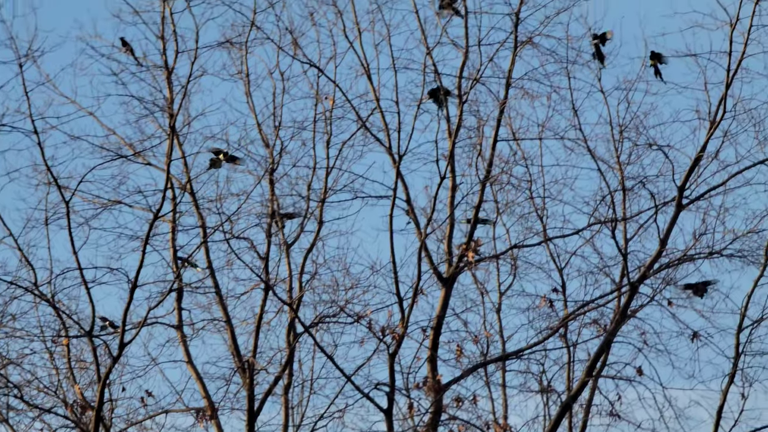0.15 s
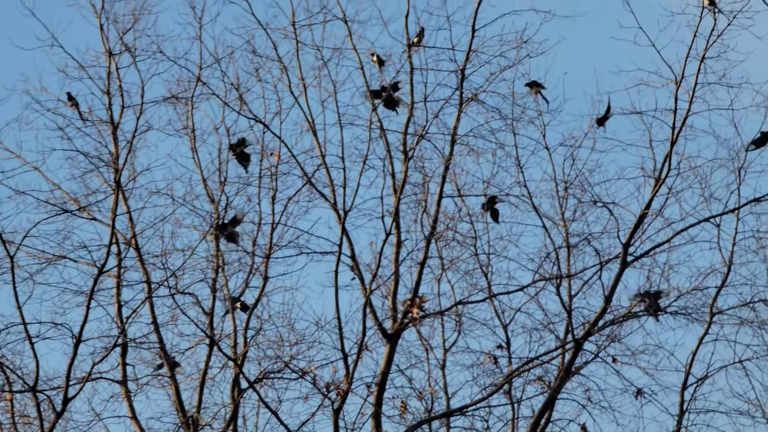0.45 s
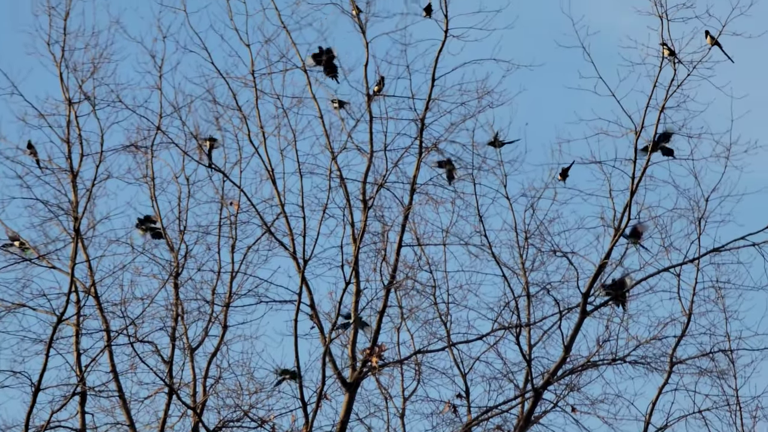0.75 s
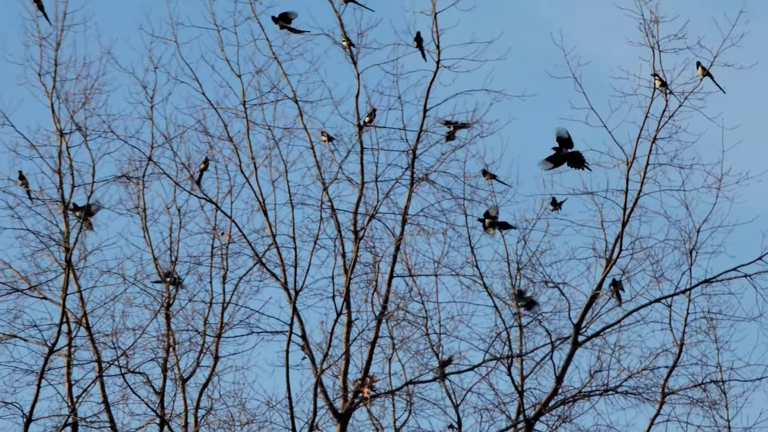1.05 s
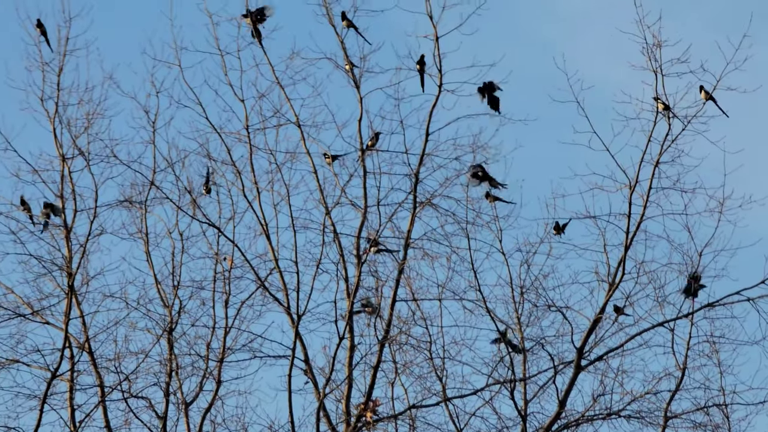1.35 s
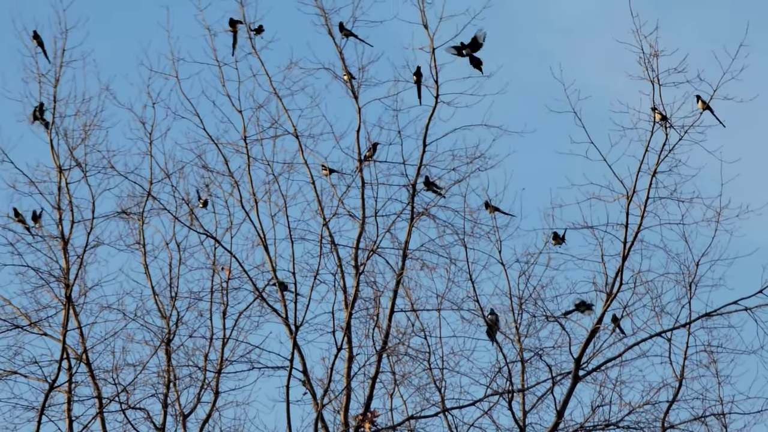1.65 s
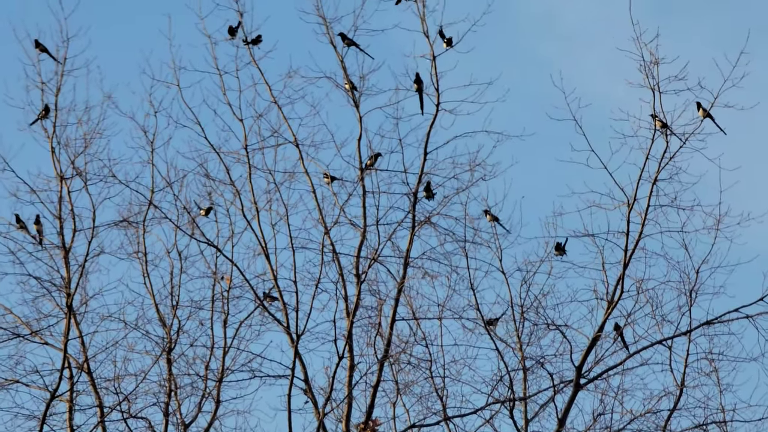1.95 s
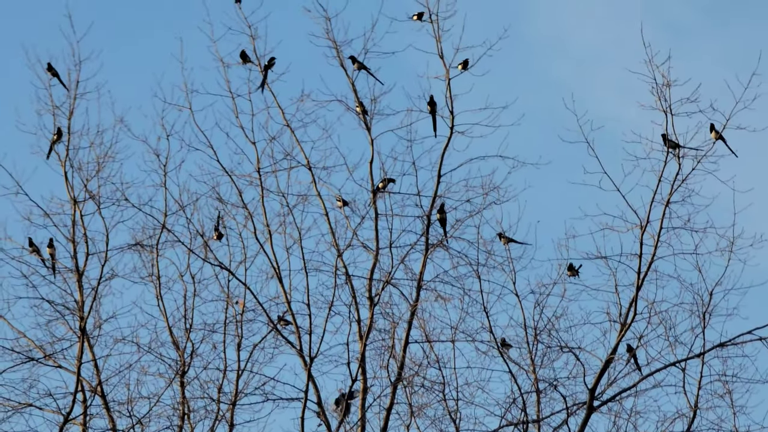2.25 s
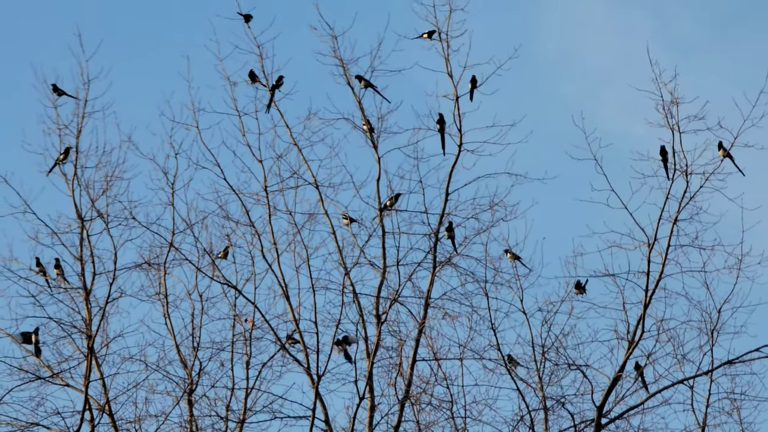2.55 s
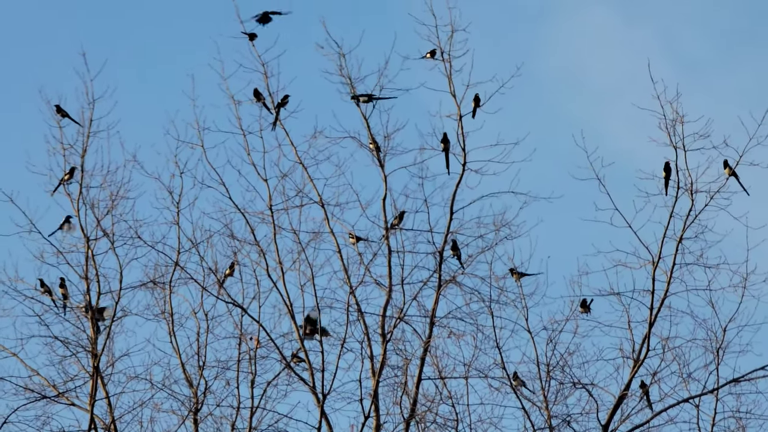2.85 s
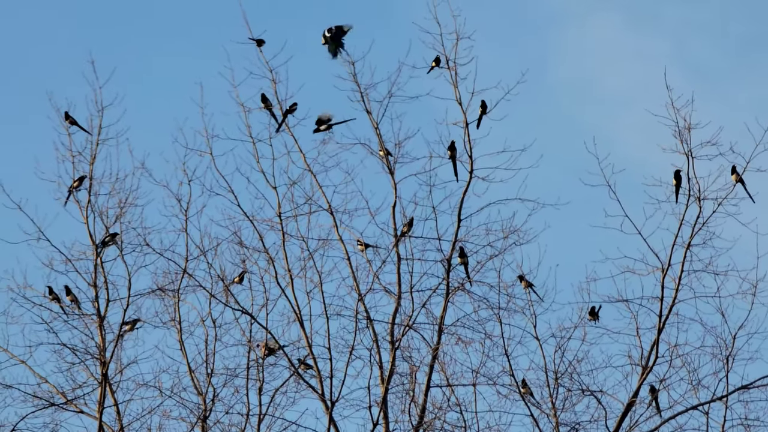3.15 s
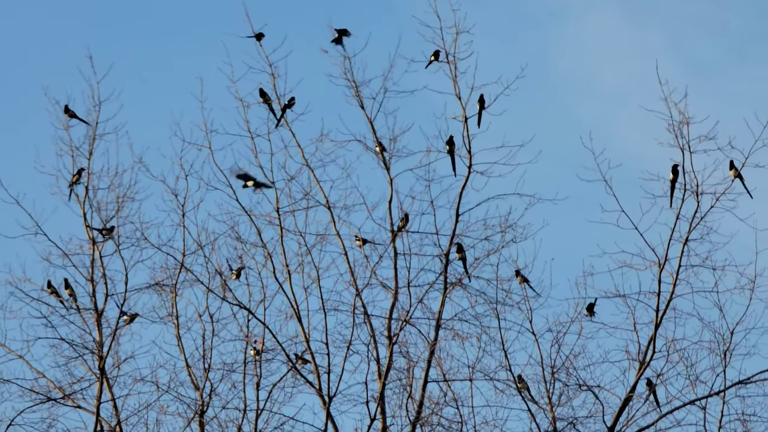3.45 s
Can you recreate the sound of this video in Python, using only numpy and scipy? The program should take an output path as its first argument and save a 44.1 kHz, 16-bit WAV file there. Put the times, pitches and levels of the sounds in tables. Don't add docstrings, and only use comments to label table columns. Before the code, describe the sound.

Magpies chatter harshly in bare treetops, hoarse rasps and quick rising chaks over low traffic rumble.

```python
import sys
import numpy as np
from scipy import signal
from scipy.io import wavfile

SR = 44100
rng = np.random.default_rng(int(sys.argv[2]) if len(sys.argv) > 2 else 0)


def transcribe(signal):
    frames = np.atleast_2d(signal).T
    limited = np.clip(frames, -1, 1)
    pcm = np.round(limited * 32767).astype(np.int16)
    wavfile.write(sys.argv[1], SR, pcm)


def volts(x):
    e = np.asarray(x, float) / 20
    return 10 ** e


N = 158760
FAR_LAG_S = 0.00028

# pitch_hz, width_hz, level_db
LOWER_THROAT = [(1723, 210, -11), (2150, 314, -13.5), (2942, 564, -1), (3964, 1000, -10.5)]
# pitch_hz, width_hz, level_db
UPPER_THROAT = [(4834, 790, 3), (5273, 730, -0.5), (6586, 880, -9)]


def rms_one(x):
    return x / np.sqrt(np.mean(x ** 2) + 1e-20)


def at_hz(points, hz):
    points = np.array(points)
    return np.interp(np.log(hz), np.log(points[:, 0]), points[:, 1])


def wobble(white, rate_hz):
    r = np.exp(-2 * np.pi * rate_hz / SR)
    return rms_one(signal.lfilter([1], [1, -2 * r, r * r], white))


def resonances(x, table):
    out = 0
    for k, (hz, width_hz, db) in enumerate(table):
        r = np.exp(-np.pi * width_hz * 1.5 / SR)
        b = (1 - r * r) / 2 * np.array([1, 0, -1])
        a = [1, -2 * r * np.cos(2 * np.pi * hz / SR), r * r]
        ringing = signal.lfilter(b, a, signal.lfilter(b, a, x))
        out = out + (-1) ** k * volts(db) * ringing
    return out


def banded_noise(spectrum, low_hz, count, patchy_db):
    # pitch_hz, likeness (0 to 1)
    likeness = [(30, 1), (200, 0.9), (500, 0.84), (1200, 0.21), (5000, 0.28), (12000, 0.045)]
    out = 0
    edges = np.minimum(low_hz * 2 ** (np.arange(count + 1) / 2), .45 * SR)
    white = rng.standard_normal((2, 2, N + 8000))
    for k, (low, high) in enumerate(zip(edges, edges[1:])):
        band = signal.butter(2, [low, high], "band", fs=SR, output="sos")
        mid, side = signal.sosfilt(band, white[k % 2])[:, 8000:]
        hz = np.sqrt(low * high)
        alike = np.clip(at_hz(likeness, hz), 0, 1)
        shared, apart = np.sqrt(1 + alike) * mid, np.sqrt(1 - alike) * side
        gain = volts(at_hz(spectrum, hz) + patchy_db * wobble(rng.standard_normal(N), 7.4))
        out = out + gain * np.array([shared + apart, np.roll(shared - apart, int(FAR_LAG_S * SR))])
    return rms_one(out)


def traffic():
    # pitch_hz, level_db (per Hz)
    rumble_colour = [(30, -19.5), (50, -11.5), (65, 4), (105, -7), (170, -12.5), (300, -17.5), (420, -18),
                     (1150, -22), (2500, -26)]
    rumble = banded_noise(rumble_colour, 24.82, count=15, patchy_db=1.7) * volts([[-.4], [.4]])
    drone = rms_one(resonances(rng.standard_normal(N), [(175.7, 8, 0)]))
    return volts(-44.5) * rumble + volts(-62.5) * drone


def hiss():
    bands = []
    for range_hz in [(12300, 15300), (7500, 11500)]:
        band = signal.butter(5, range_hz, "band", fs=SR, output="sos")
        bands.append(rms_one(signal.sosfilt(band, rng.standard_normal((2, N)))))
    high, air = bands
    high_level = volts(-77.5 + 1.6 * wobble(rng.standard_normal(N), 4.6))
    return high_level * volts([[-3.5], [3.5]]) * high + volts(-88) * air


def far_flock():
    # time_s, level_db
    swell = [(0, -47), (.6, -47), (1.15, -49), (1.2, -56.5), (1.3, -58.5), (1.9, -47.5), (2.3, -45.5),
             (3.1, -47.5), (3.6, -47.5)]
    white = rng.standard_normal((5, N))
    s, db = np.transpose(swell)
    murmur = resonances(white[:2], LOWER_THROAT) + volts(-11.0) * resonances(white[2:4], UPPER_THROAT)
    level_db = np.interp(np.arange(N) / SR, s, db) + 5.2 * wobble(white[4], 2.3)
    return volts(level_db) * volts([[-3.5], [3.5]]) * rms_one(murmur)


def hoots():
    # time_s, pitch_hz, level_db
    paths = [
        [(.005, 593, -53.5), (.042, 715, -37), (.082, 844, -53), (.13, 792, -48), (.15, 747, -52),
         (.2, 718, -57)],
        [(1.222, 650, -70), (1.238, 667, -43.5), (1.318, 746, -37.5), (1.35, 723, -45.5), (1.39, 715, -65),
         (1.46, 726, -54)],
        [(.02, 511, -63), (.1, 570, -52.5), (.2, 575, -66)],
    ]
    t, out = np.arange(N) / SR, 0
    for rows in paths:
        s, hz, db = np.transpose(rows)
        level = volts(np.interp(t, s, db, -150, -150) + wobble(rng.standard_normal(N), 28))
        phase = 2 * np.pi * np.cumsum(np.interp(t, s, hz)) / SR
        out = out + np.sqrt(2) * level * np.sin(phase)
    return np.array([out, np.interp(t - FAR_LAG_S, t, out)])


def voice(pitch_hz, upper_db, partials_db, jitter, rough, white):
    # pitch_hz, width_hz, level_db
    call_top = [(7440, 1100, -17.5), (12700, 6900, -43.5)]
    phase = 2 * np.pi * np.cumsum(pitch_hz * (1 + jitter * wobble(white[0], 127))) / SR
    flutter = volts(3.5 * wobble(white[1], 70))
    tones = 0
    for k, db in enumerate(partials_db, 2):
        own_flutter = np.roll(flutter, 900 * k)
        tones = tones + volts(db) * own_flutter * np.cos(k * phase + k * k)
    tones = rms_one(tones)
    breath = white[2] * (1 + np.cos(phase)) * flutter / 1.4
    low = (1 - rough) * tones + rough * breath
    upper_rough = rough + .25
    high = (1 - upper_rough) * tones + upper_rough * breath
    return (resonances(low, LOWER_THROAT) + volts(upper_db) * resonances(high, UPPER_THROAT)
            + volts(1.38 * upper_db) * resonances(high, call_top))


def place(out, x, start_s, pan_db, lag_s):
    t = np.arange(len(x)) / SR
    right = np.interp(t - lag_s, t, x)
    pair = np.array([x * volts(pan_db / 2), right * volts(-pan_db / 2)]) / np.cosh(pan_db * np.log(10) / 40)
    i = max(int(start_s * SR), 0)
    pair = pair[:, :out.shape[1] - i]
    out[:, i:i + pair.shape[1]] += pair


def calls(rows, octaves, swell_db, fall_s, partials_db, jitter, rough):
    out = np.zeros((2, N))
    for top_s, rise_s, db, top_hz, upper_db in rows:
        white, seat = rng.standard_normal((3, 12000)), rng.standard_normal(2)
        t = np.arange(12000) / SR - rise_s
        left = np.clip(-t / rise_s, 0, 1)
        pitch_hz = top_hz * 2 ** (-octaves * (np.hypot(left, .06) - .06))
        beak_db = upper_db - 4 * left
        call = voice(pitch_hz, beak_db, partials_db, jitter, rough, white)
        attack = np.clip((t + rise_s) / 0.019, 0, 1)
        shape = volts(-swell_db * left) * attack * np.exp(-np.maximum(t / fall_s, 0) ** 2)
        call = call / np.sqrt(np.mean(call[abs(t) < .02] ** 2)) * shape * volts(db)
        place(out, call, top_s - rise_s, -8.5 + 1.5 * seat[0], -0.000019 + .00005 * seat[1])
    return out


def magpies():
    # end_s, length_s, level_db, top_pitch_hz, upper_resonance_db
    glides = [(.16, 0.14, -48, 500, 5), (.785, 0.052, -42.5, 527.5, -3), (1.13, 0.074, -49, 476, -12),
              (1.425, .12, -39.5, 603, -6.5), (1.8, 0.09, -38.5, 530, -7), (1.99, 0.062, -33, 776, 7),
              (2.41, .07, -37, 598, 0), (2.83, 0.086, -33, 575.5, -11), (3.0, 0.06, -36, 533, -9),
              (3.235, .09, -43, 533, 8), (.62, 0.034, -43, 920, 11), (.965, .045, -46.5, 864, 0),
              (1.56, 0.1, -44, 960, 3), (1.83, 0.049, -49.5, 960, 6), (2.0, .06, -44, 1070, 1),
              (2.17, .06, -46, 953, 1), (2.41, .05, -51, 1160, 14), (2.56, 0.075, -48, 1140, 9),
              (3.07, 0.057, -46, 997, 2), (3.385, .05, -49, 1100, 10), (3.56, 0.042, -44, 1144, 10)]
    # start_s, length_s, level_db, pitch_hz, upper_resonance_db
    rasp_rows = [(0.029, 0.13, -38.5, 543.6, -7), (0.219, 0.11, -37.5, 534, -1),
                 (0.416, 0.13, -35, 536, -12), (0.559, 0.07, -41, 588.6, -9.5),
                 (0.637, 0.12, -42.5, 530.5, -3.5), (0.778, 0.11, -48.5, 561.5, -8),
                 (0.904, .07, -39, 604, -3), (1.061, 0.095, -40.5, 549, -10), (1.283, 0.14, -47, 562, -1),
                 (1.472, .147, -37, 521, -6.5), (1.662, 0.13, -35.5, 514, -1.5),
                 (1.9, 0.088, -35.5, 519.4, -2), (2.076, 0.081, -37.5, 534.7, -4),
                 (2.281, 0.15, -40, 557, -7.5), (2.457, 0.14, -37, 555, -7), (2.705, 0.2, -42, 560, -3.5),
                 (2.914, 0.1, -41.5, 519, 1), (3.034, 0.045, -50, 505.5, 0), (3.137, 0.15, -57, 583, -1),
                 (3.32, 0.069, -41, 502.5, 10.5), (3.48, 0.073, -47, 504, -19)]
    # top_s, level_db, top_pitch_hz, upper_resonance_db
    clear_chaks = [(0.858, -41.5, 697, -10), (1.427, -31.5, 737, 3.5), (2.234, -43, 678, -17),
                   (2.413, -35, 692, 1), (2.579, -24.5, 737, 1.5), (3.392, -30, 718, -1),
                   (3.553, -30, 729.5, 3.5)]
    # top_s, level_db, top_pitch_hz,
    # upper_resonance_db
    hoarse_chaks = [(1.564, -31.5, 747, -1.5), (1.6, -35, 744.5, 1), (1.7, -34, 685, -14),
                    (1.73, -33.5, 742, 1), (1.799, -35, 736, 11.5), (1.961, -32.5, 738, 2),
                    (1.99, -32.5, 746.6, 1), (2.021, -35.5, 702, -1), (2.168, -35, 730, 6),
                    (2.363, -32, 736, 0.5), (2.5, -35.5, 738, -2), (2.763, -30, 699, -5),
                    (2.834, -33.5, 789, 22), (2.895, -35.5, 753, -6), (2.959, -32.5, 705, -3),
                    (3.008, -32, 767, 4), (3.083, -34.5, 751, 6), (3.257, -33, 753, 6.5),
                    (3.447, -31.5, 740, 1.5),
                    (0.113, -36, 772, -6.5), (0.298, -31, 715, -10), (.36, -41, 725, 3),
                 (0.51, -32.5, 739, 2.5), (0.539, -41, 694, 5.5), (0.658, -35.5, 700, -5),
                 (0.687, -38, 790, -22), (.746, -52, 740, -9), (0.901, -41, 790, -23),
                 (.946, -37, 697, -5.5), (.975, -45.5, 808, -19), (1.008, -43, 700, -24),
                 (1.062, -40, 728, -12), (1.126, -43.5, 830, -29), (1.17, -45, 733, 0.5),
                 (2.676, -37, 729, -1), (3.362, -41, 496.5, -22)]
    chak_partials = [-11, -5, 0, -6, -8, -3, -10, -14, -16, -18, -20]
    glide_partials = [-22, -20, -16, -10, -3, 0, -4, -12, -14, -14]
    rasp_partials = [-6, -2, 0, 0, 0, 0, 0, 0, 0, 0, 0, 0, 0]
    clear = [(s + 0.0045, .11, *rest) for s, *rest in clear_chaks]
    hoarse = [(s + .005, .08, *rest) for s, *rest in hoarse_chaks]
    rasps = [(s + length, length, *rest) for s, length, *rest in rasp_rows]
    return (calls(clear, octaves=.95, swell_db=16, fall_s=.011, partials_db=chak_partials, jitter=.009, rough=.1)
            + calls(hoarse, octaves=.85, swell_db=17, fall_s=.011, partials_db=chak_partials,
                    jitter=.022, rough=.27)
            + calls(glides, octaves=.42, swell_db=5.5, fall_s=0.022, partials_db=glide_partials,
                    jitter=.022, rough=.1)
            + calls(rasps, octaves=0.4, swell_db=2.5, fall_s=0.022, partials_db=rasp_partials,
                    jitter=.026, rough=.42))


def scatter(x):
    t = np.arange(SR // 2) / SR
    tail = rng.standard_normal((2, SR // 2)) * volts(-60 * t / .2) * (t > .004)
    tail = signal.lfilter([1], [1, -.4], tail)
    tail = tail / np.sqrt(np.sum(tail ** 2, axis=1, keepdims=True))
    wet = signal.fftconvolve(x[None], tail, axes=1)[:, :N]
    return volts(-11) * volts([[-3.5], [3.5]]) * wet


def knocks():
    # time_s, pitch_hz, fall_by_60_db_s, level_db, build_up_s
    taps = [
        (.245, 254, 0.018, -28, 0.00023),
        (2.918, 6400, 0.054, -31.5, 0.0053),
        (2.924, 5700, 0.052, -29, .008),
    ]
    out = 0
    for s, hz, t60, db, build_s in taps:
        t = np.maximum(np.arange(N) / SR - s, 0)
        out = out + volts(db - 60 * t / t60) * np.sin(2 * np.pi * hz * t) * np.minimum(t / build_s, 1)
    return out


def scene():
    birds = magpies()
    return traffic() + hiss() + far_flock() + hoots() + birds + scatter(birds.mean(axis=0)) + knocks()


def low_pass(x):
    return signal.sosfilt(signal.butter(12, 15480, fs=SR, output="sos"), x)


def record(dry):
    dip = 0.33 * dry + 0.57 * signal.lfilter(*signal.iirnotch(10300, 2.5, fs=SR), dry)
    dip[1] -= 0.67 * signal.lfilter(*signal.iirpeak(9150, 2.5, fs=SR), dip[1])
    cut = signal.sosfilt(signal.cheby2(12, 60, 15900, fs=SR, output="sos"), dip)
    return low_pass(cut)


dry = scene()
out = record(dry)
transcribe(out)
```